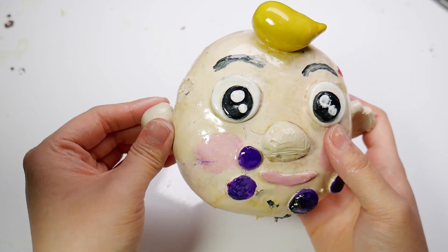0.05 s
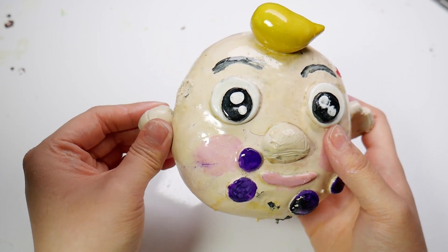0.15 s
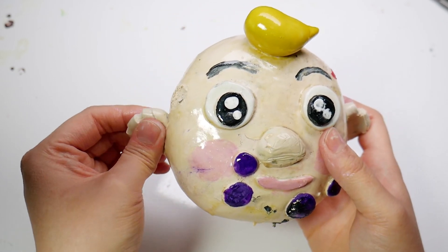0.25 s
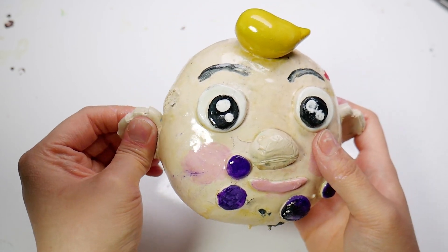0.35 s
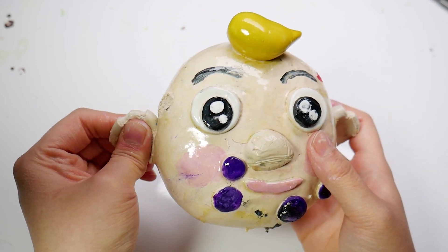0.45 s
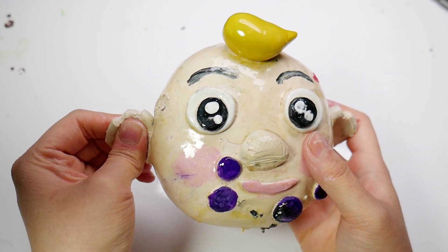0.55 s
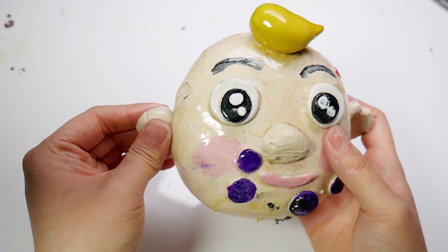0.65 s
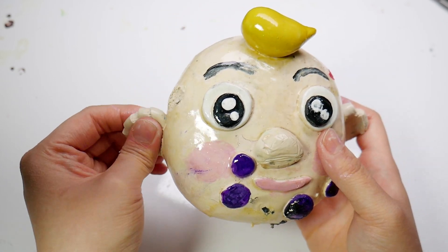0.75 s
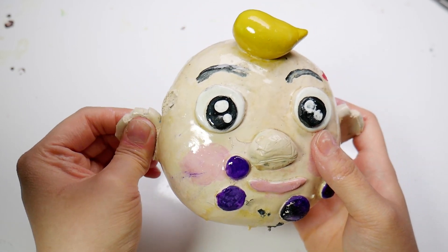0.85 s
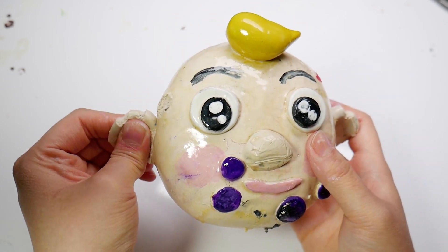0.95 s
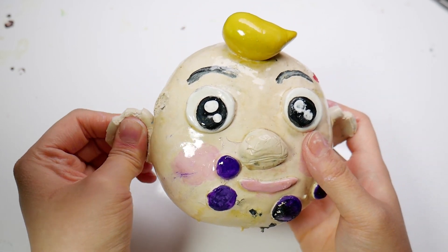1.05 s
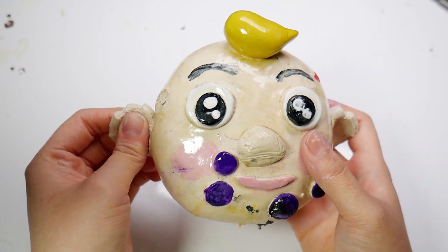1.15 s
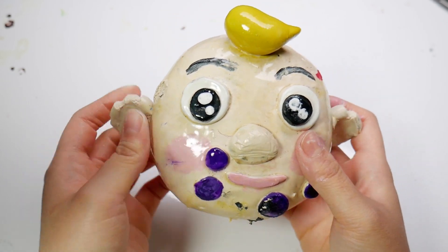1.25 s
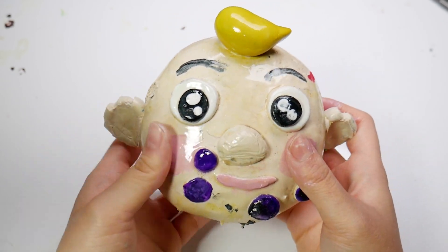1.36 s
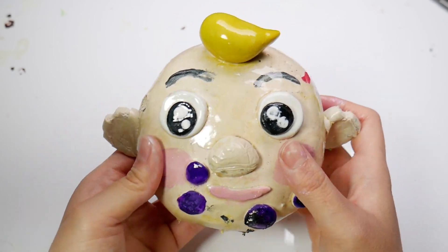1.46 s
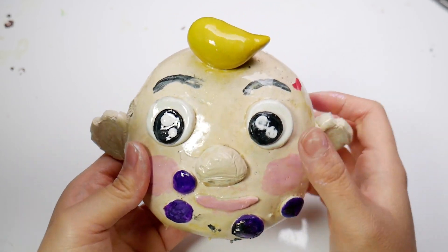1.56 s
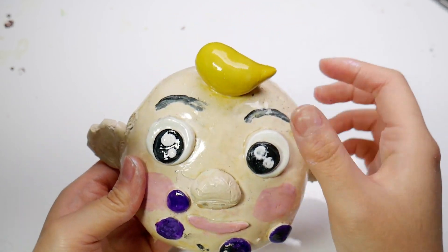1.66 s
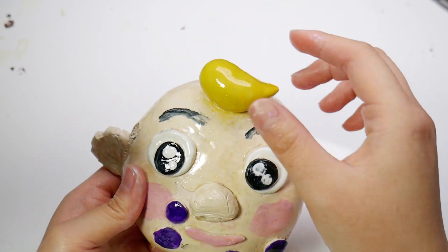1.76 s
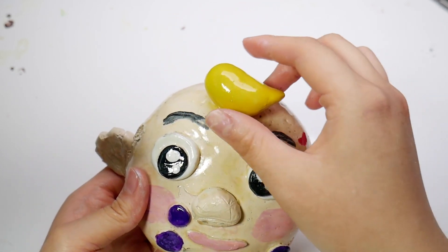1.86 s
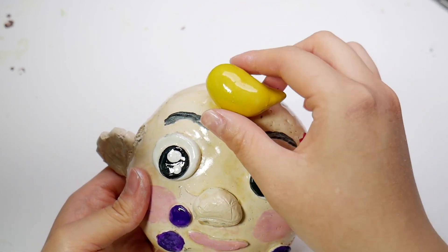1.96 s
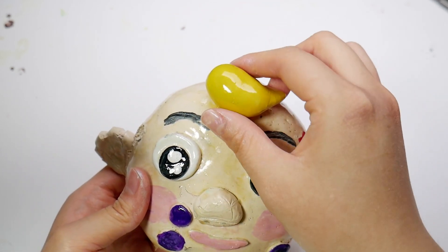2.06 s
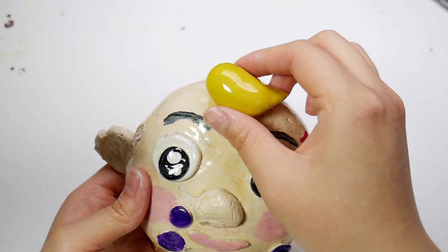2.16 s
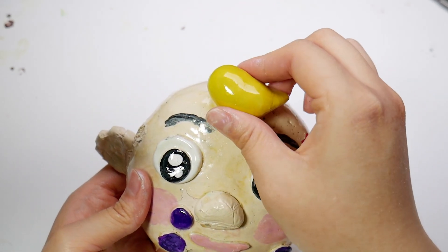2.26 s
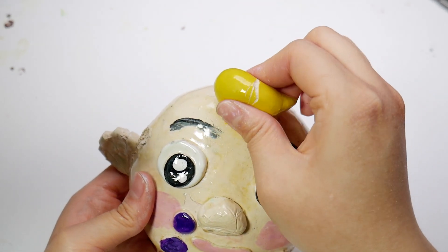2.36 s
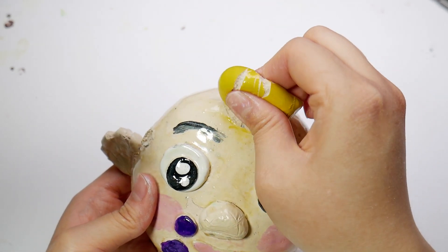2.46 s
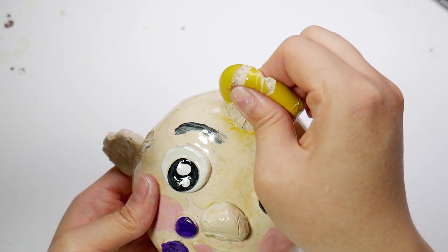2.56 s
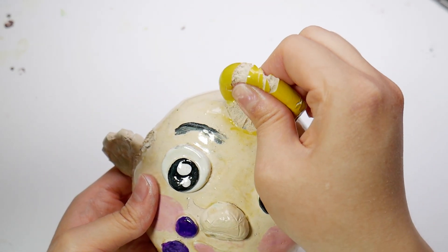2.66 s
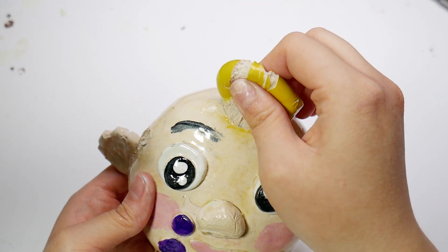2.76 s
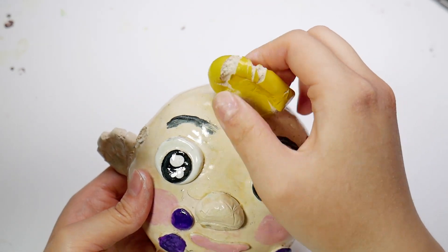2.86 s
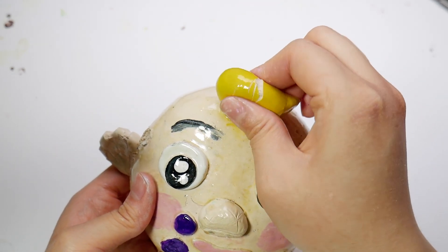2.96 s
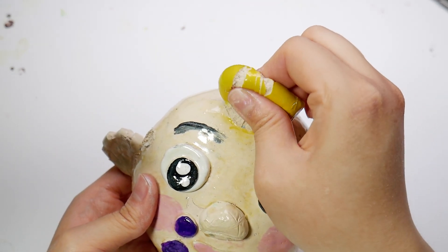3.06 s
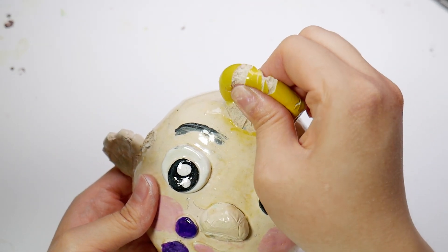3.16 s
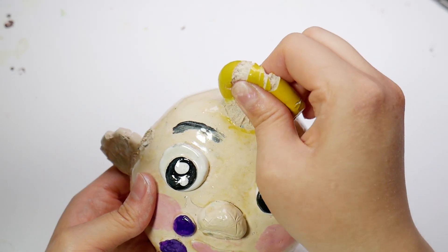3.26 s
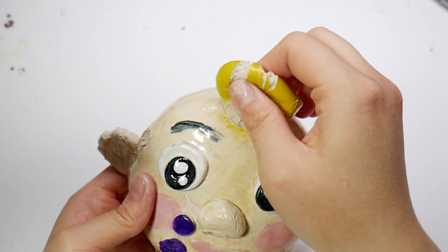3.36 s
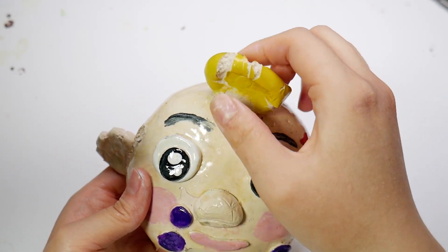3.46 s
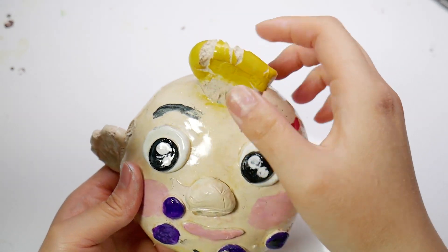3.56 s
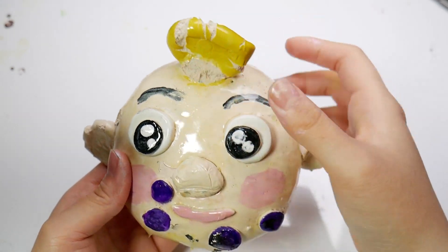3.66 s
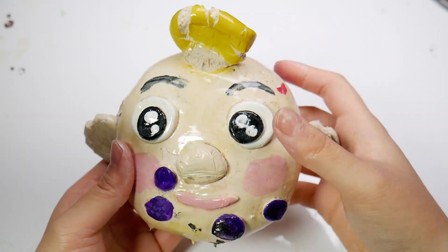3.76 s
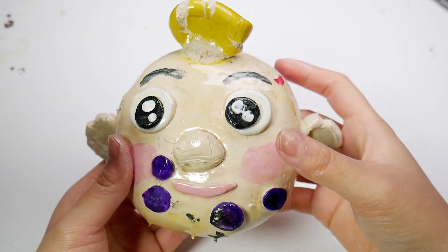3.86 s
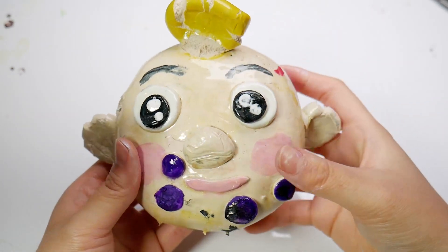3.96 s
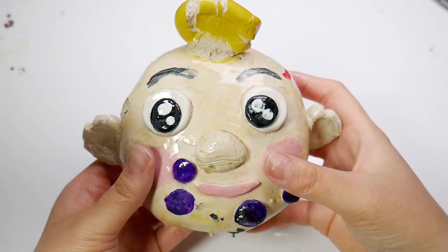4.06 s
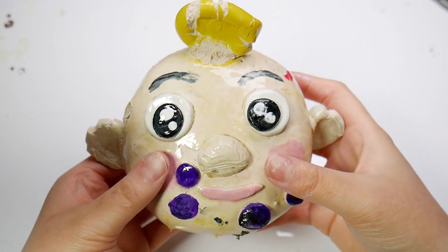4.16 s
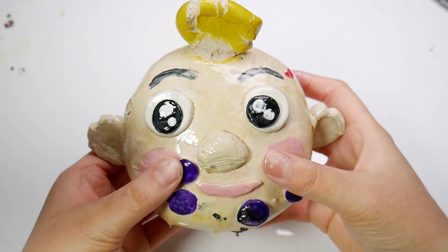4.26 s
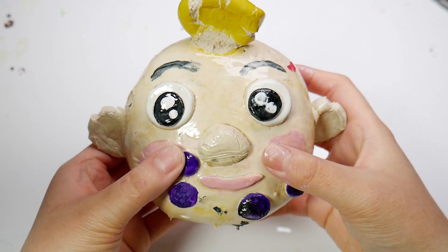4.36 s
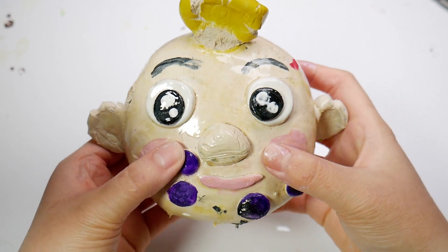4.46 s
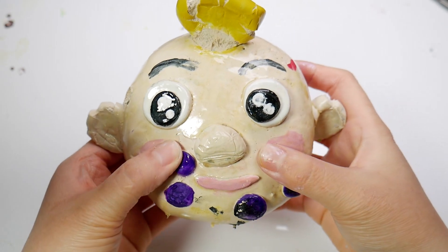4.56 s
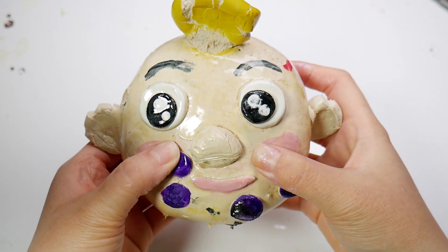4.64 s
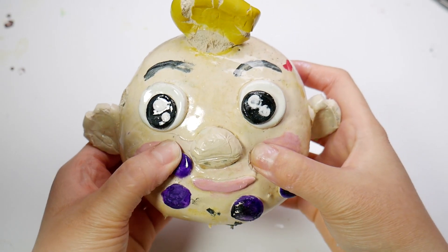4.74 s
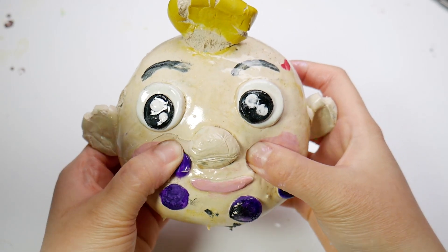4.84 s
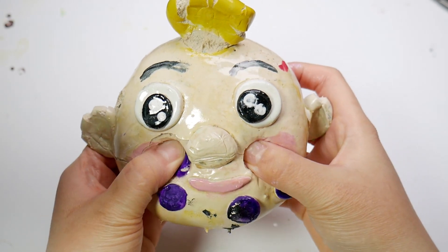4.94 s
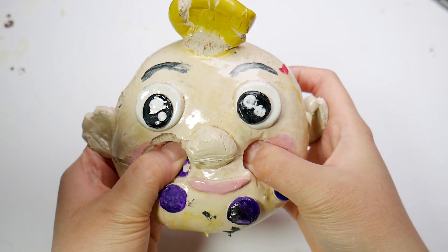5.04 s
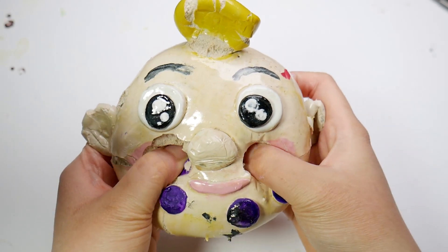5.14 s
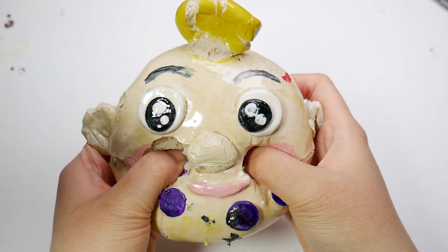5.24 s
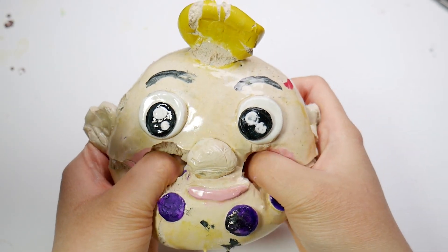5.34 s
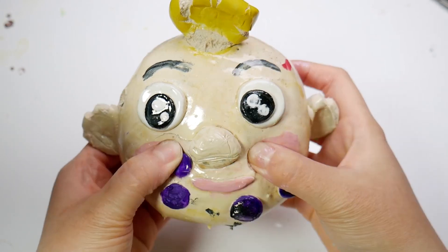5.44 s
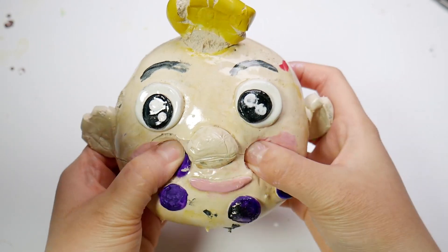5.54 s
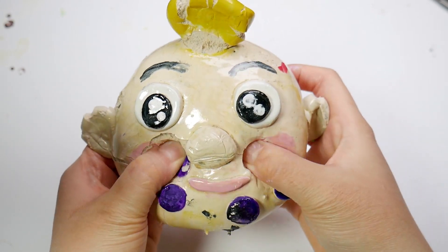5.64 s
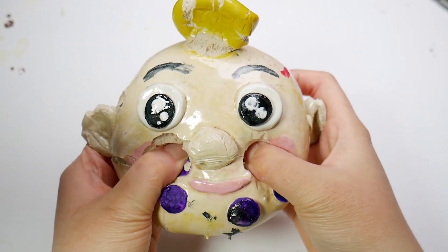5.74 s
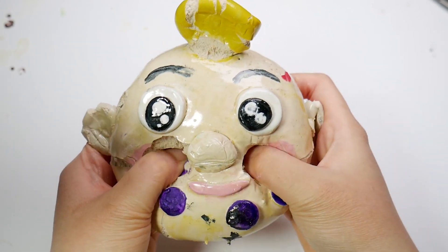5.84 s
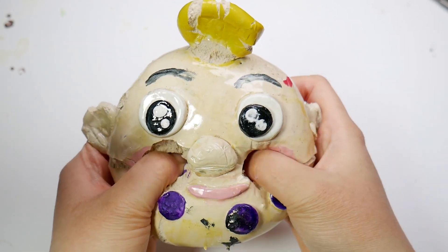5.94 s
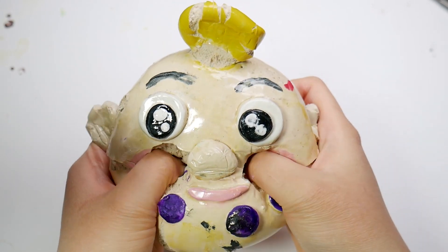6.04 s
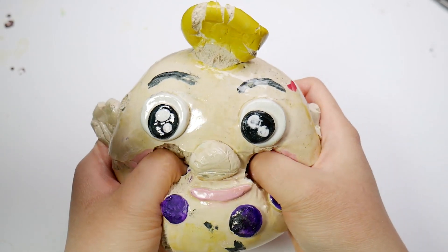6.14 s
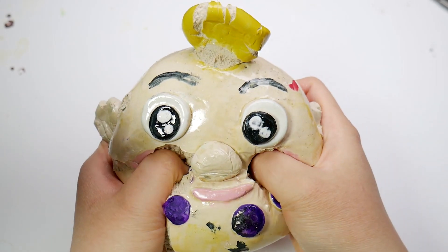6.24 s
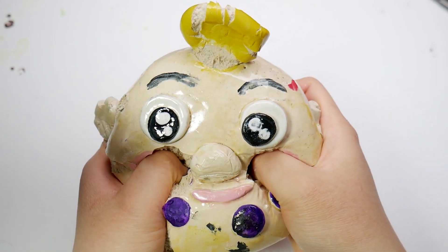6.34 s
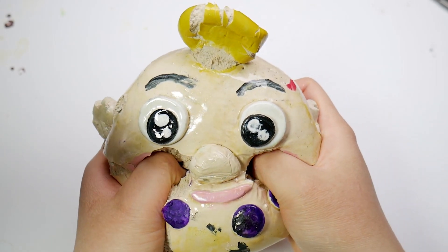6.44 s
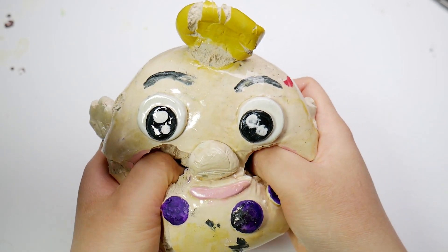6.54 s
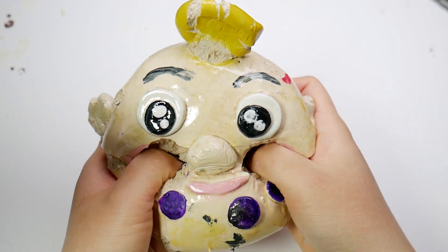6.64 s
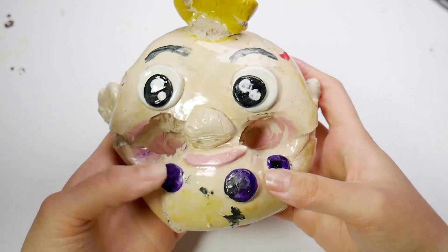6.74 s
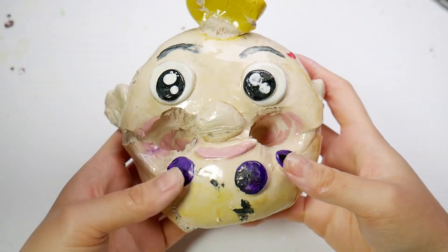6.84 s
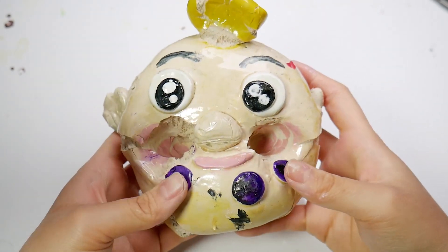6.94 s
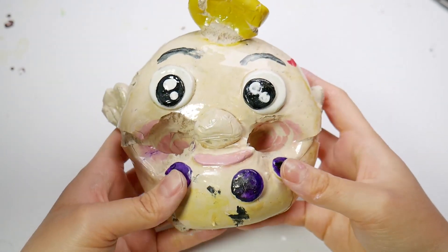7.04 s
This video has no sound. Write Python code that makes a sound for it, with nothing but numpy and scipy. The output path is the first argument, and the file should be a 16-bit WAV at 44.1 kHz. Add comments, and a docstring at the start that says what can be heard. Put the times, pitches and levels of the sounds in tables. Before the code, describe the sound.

A quiet, nearly dry room with very faint low hum and hiss, stereo microphone very close. From about 0.15 s a thin glazed clay ear snaps in a rapid cluster of bright, brittle cracks and gritty ticks; the same burst repeats at about 0.6 s, ending near 1.1 s. Small clicks and soft dull knocks follow at 1.2-1.6 s, then barely audible finger rubbing. At 2.38 s a thick piece breaks with loud, ringing, overloaded cracks and showering crumbs, repeated from about 2.9 s to 3.5 s. Quiet handling ticks until 4.6 s. From 4.7 s the hollow shell caves in: dense, heavy crunches with low-mid thumps, strongest around 4.9-5.4 s, repeated through about 6.1 s. Kneading continues with uneven snaps and crumbling to 6.6 s, then thins into sparse soft ticks and crumbs around 7 s.

```python
"""Fingers crack the glazed shell of a hollow clay figure close to a stereo microphone in a quiet room.
They break a thin ear, turn the figure and hold it still, then crack the tuft on top and change grip; the
cheeks cave in, the holes are kneaded and the figure is let go. Noise-driven resonances make each break snap,
ring and thump; random crumbs crackle around the breaks and soft damped sines are low thuds.
The input overloads, and an edit plays three bursts twice in a row: ear, tuft, then cheeks."""
import sys
import numpy as np
from scipy import signal
from scipy.fft import rfft, irfft
from scipy.io import wavfile
from scipy.ndimage import uniform_filter1d

SR = 44100
rng = np.random.default_rng(int(sys.argv[2]) if len(sys.argv) > 2 else 0)


def bounce(signal):
    """Save signal as a 16-bit WAV file at the path given by the first command-line argument."""
    frames = np.transpose(np.atleast_2d(signal))
    limited = np.clip(frames, -1, 1)
    pcm = np.round(limited * 32767).astype(np.int16)
    wavfile.write(sys.argv[1], SR, pcm)


def gain_from_db(level_db):
    """Convert decibel levels to linear amplitude factors (20 dB per decade)."""
    decades = np.asarray(level_db, float) / 20
    return 10 ** decades


N = 313110
T = np.arange(N) / SR


def level(x):
    """Scale to rms 1."""
    return x / np.sqrt(np.mean(x ** 2))


def resonate(x, peaks):
    """Sum of band-pass resonances (hz, width_hz, level_db) with alternating sign."""
    out = 0
    for k, (hz, width_hz, db) in enumerate(peaks):
        b, a = signal.iirpeak(hz, hz / width_hz, fs=SR)
        out = out + (-1) ** k * gain_from_db(db) * signal.lfilter(b, a, x)
    return out


def unit_gain(peaks):
    """Gain that keeps white noise at its own rms through the resonances."""
    impulse = np.eye(1, 4096)[0]
    return 1 / np.sqrt(np.sum(resonate(impulse, peaks) ** 2))


def colour(x, points):
    """Shape the spectrum by (hz, level_db) points, joined on a log frequency axis."""
    hz, db = np.transpose(points)
    f = np.maximum(np.arange(len(x) // 2 + 1) * SR / len(x), 1)
    gain = gain_from_db(np.interp(np.log(f), np.log(hz), db))
    return irfft(rfft(x) * gain, len(x))


def place(start_s, rows):
    """Lay one row of samples at each start time."""
    out = np.zeros(N + rows.shape[1])
    for start, row in zip((start_s * SR).astype(int), rows):
        out[start:start + len(row)] += row
    return out[:N]


# spectrum of the room air: hz, relative level_db (per Hz)
AIR_SPECTRUM = [(24, -47), (40, -13), (124, -1.5), (220, -6), (467, -12.5), (770, -14.5), (2840, -18),
                (16000, -29)]
# how far the side stands above the mid: hz, side_minus_mid_db
AIR_WIDTH = [(60, -16), (1300, -6), (12000, 1.5)]
# level of the air over time: time_s, mid_rms_db
AIR_LEVEL = [(2.3, -51), (3.5, -54)]


def air():
    """Room hum and microphone hiss are shaped noise, with a side signal that differs left and right."""
    mid, side = (colour(rng.standard_normal(N), AIR_SPECTRUM) for _ in range(2))
    gain = gain_from_db(np.interp(T, *np.transpose(AIR_LEVEL))) / np.std(mid)
    side = colour(side, AIR_WIDTH)
    return gain * np.array([mid + side, mid - side])


# what the fingers work on, in turn: thin ear, turning the figure, holding it still, tuft on top,
# changing grip, cheeks caving in, kneading the holes, letting go
# from_s, snap_db and crumbs_db (re break), crumb_body_db and crumb_grit_db (re their crackle drive)
PARTS = [(0, -1, -26, -13.5, 3), (1.4, -8.5, -49, -3, 0), (1.64, -9, -23, -6.5, -20),
         (2.3, -2.5, -27.5, -16, 0), (3.55, -4, -25, -3, -5.5), (4.58, -5.5, -22.5, -3.5, -15.5),
         (6.101, -5, -23, -5.5, -4.5), (6.62, -12, -28, -3.5, -9)]


def part(s):
    """Snap, crumb, crumb body and crumb grit levels of the part being worked on at times s."""
    rows = np.array(PARTS)
    current = np.searchsorted(rows[:, 0], s, side="right") - 1
    return rows[current, 1:].T


FLAKE_HZ, FLAKE_DB_PER_OCTAVE = 5000, -4.5  # higher shards are small flakes and move the shell less
SPIKE_DB, SPIKE_S = -4.5, 0.00071  # the first swings of a shard overshoot its ring
EAR_UNTIL_S, EAR_TOP_DB = 1.4, -1  # the thin ear adds this much of the highest grit resonance
# resonances of the hollow body, the glazed shell and the dry treble grit: hz, width_hz, level_db
BODY_PEAKS = [(161, 430, -11), (285.7, 81, -1.5), (530, 275, -3.5), (864, 150, 1.5), (1260, 360, -4.5)]
SHELL_PEAKS = [(1743, 1195, -1), (2630, 1960, 0.5), (3512, 460, 4.5), (5200, 4130, -8.5)]
GRIT_PEAKS = [(7150, 3370, -2.5), (13800, 2300, -7)]
# fractures: start_s, level_db, shard_ring_hz, thump_db (re level_db), ring_t60_ms
BREAKS = [(0.1514, 0.5, 4700, -13, 5.7), (0.1905, 7, 3520, -37.5, 12), (0.1995, 2, 7500, -29, 4),
          (0.2039, -3, 14600, -25.5, 5.7), (0.2105, 0, 14700, -24.5, 4.2), (0.21, -7.5, 3520, -15.5, 6),
          (0.2168, -4.5, 14800, -28, 3.3), (0.229, -8, 14500, -24, 4.6), (.251, 0, 3140, -13.5, 6.9),
          (0.2617, 1, 14800, -21, 6.3), (0.271, -1, 7840, -22, 18), (0.2798, -4.5, 9600, -20.5, 3.4),
          (0.283, -3, 8500, -26, 8.2), (0.291, -5.5, 3000, -9.5, 15), (0.2943, -4.5, 4800, -13, 14),
          (.303, -3, 3550, -9, 21), (0.3214, 4, 8750, -36, 8.4), (0.3252, -4.5, 3500, -27, 6),
          (0.3447, -3.5, 3240, -9.5, 12), (0.353, -10, 3200, -37.5, 3.6), (.359, -0.5, 3370, -37, 2.1),
          (0.3925, -3.5, 8900, -28, 4.1), (0.3945, -8.5, 3390, -42.5, 5.5), (0.401, 0, 3340, -25, 8.3),
          (0.4032, -2, 3420, -25.5, 8), (0.4116, -14.5, 3500, -29.5, 4.1), (0.4258, -7.5, 8870, -49.5, 4.4),
          (0.4305, 4.5, 3520, -35.5, 8.4), (0.4477, -16.5, 9250, -32.5, 3.3),
          (0.452, -12.5, 8760, -33.5, 6.6), (0.4656, -8.5, 9160, -23, 3.4), (0.482, 1.5, 10300, -22, 3.1),
          (0.4891, -21.5, 8900, -35, 2.4), (0.5113, -7, 12100, -39.5, 2), (1.1212, -18.5, 3680, -19, 3.6),
          (1.205, -26, 6000, -30, 6.6), (1.2393, -15, 7200, -25, 4.8), (1.257, -26.5, 7000, -11, 7.3),
          (1.2731, -15.5, 4100, -14.5, 10), (1.2815, -2.5, 6400, -21.5, 3), (1.2839, -2.5, 5230, -8.5, 2.5),
          (1.3304, -5, 5330, -12.5, 6.1), (1.4577, -16, 3700, -2.5, 8), (1.4706, -18, 1556, -1.5, 21),
          (1.496, -24.5, 1500, 3, 5.5), (1.5294, -8.5, 1700, -2.5, 6), (1.5485, -20, 2000, -16, 10),
          (1.59, -31, 3050, 6, 25), (2.3424, -16, 3280, -18, 7), (2.3475, -8, 1790, -30, 11),
          (2.362, -1.5, 1965, -34.5, 11), (2.3753, -7.5, 3100, -17.5, 11), (2.3847, 14.5, 1700, -26, 18.3),
          (2.4033, 11, 1806, -26.5, 24), (2.4384, 3, 3200, -20, 10), (2.4513, -6, 5970, -28.5, 4),
          (2.455, 7, 3140, -16.5, 16), (2.4663, -3.5, 3150, -17, 6.1), (2.4699, 1, 4040, -20, 8),
          (2.474, -5, 2200, -37, 4), (2.477, 1, 2000, -29, 5), (2.481, 2, 3310, -29.5, 5.9),
          (2.4847, -2, 3340, -21, 3.6), (2.4926, 0, 1740, -30, 11), (2.501, -4.5, 2010, -22, 18),
          (2.5227, -4, 3100, -26.5, 5), (2.5322, -16.5, 2550, -20.5, 6), (2.5416, -13.5, 3290, -28.5, 4),
          (2.5597, 2, 3520, -31.5, 11), (2.5617, 0.5, 2546, -31, 24), (2.5677, -1, 7200, -39.5, 6.8),
          (2.5702, -0.5, 4400, -29.5, 5.6), (2.603, -3.5, 1886, -31, 11), (2.607, -5.5, 2760, -27, 4),
          (2.6226, 0.5, 3570, -26, 5), (2.6287, -3, 2840, -28.5, 12), (2.648, -9.5, 2000, -32, 9.5),
          (2.6544, -9, 3055, -24, 8.9), (2.6695, -13.5, 3270, -24, 3.75), (2.6795, -14.5, 3200, -38, 4.9),
          (2.7369, -1.5, 3200, -17, 10), (2.8158, -7, 1850, -19, 12), (2.8919, -7.5, 3310, -10, 18),
          (2.9191, -18.5, 3400, -4, 8.6), (3.8748, -30, 990, 1.5, 8), (3.9645, -25.5, 2920, 1.5, 7.6),
          (3.9787, -26, 3300, 1, 14), (4.0816, -16, 1196, -4.5, 12), (4.1378, -13, 1330, -6.5, 8),
          (4.2725, -13, 2600, -8.5, 5), (4.603, -28, 1670, -34, 13), (4.6601, -13.5, 1600, -7, 9.8),
          (4.7109, -1, 3130, -8, 17), (4.7498, -14.5, 2000, -25, 4), (4.7539, 4, 1743, -8, 16),
          (4.795, 7, 1386, -7, 6.2), (4.8058, 5.5, 3200, -4.5, 8), (4.8204, -4.5, 3250, -6, 5),
          (4.8251, -2, 3250, -5.5, 10), (4.8422, 0.5, 1660, -20, 8.1), (4.8475, 2.5, 2110, -13, 8.7),
          (4.863, -1, 1810, -10, 4.9), (4.8707, 2, 3430, -24, 7), (4.874, -1.5, 13200, -28.5, 3.6),
          (4.8936, 0, 3210, -2.5, 4.8), (4.8995, 10.5, 2030, -0.5, 17), (4.9182, -0.5, 3480, -8, 7.5),
          (4.927, 4, 2734, -8, 7), (4.936, 10.5, 1845, -11, 7.9), (4.9423, -3.5, 3460, -9, 4),
          (4.949, -5.5, 3350, -2, 8), (4.9559, 6.5, 3440, -7.5, 5.36), (4.9637, 2.5, 1800, 0.5, 6.6),
          (4.9736, 7.5, 1490, 1.5, 13), (4.9764, -0.5, 3550, -9, 7.3), (4.9848, 3, 3090, -0.5, 15),
          (4.994, 9, 2080, -8, 10.5), (4.9977, 9.5, 2110, 0, 6), (5.009, 0.5, 1185, -13, 4),
          (5.0174, 1.5, 2930, -21, 4), (5.02, 9, 1700, -14, 7.5), (5.028, -1, 2550, -23.5, 9.2),
          (5.0313, 5, 2410, -17.5, 8.5), (5.058, -3, 1723, -8, 20), (5.0756, 6.5, 2605, 0.5, 20),
          (5.0913, 0.5, 3350, -1, 22), (5.0985, 8, 2300, -6.5, 17), (5.1037, -2.5, 2400, -8.5, 7.8),
          (5.1227, -9, 3100, -9.5, 12), (5.1388, 11, 2426, -10, 5.8), (5.1563, -3.5, 3380, -17.5, 10),
          (5.1679, 3.5, 1290, -3, 11), (5.1716, 8.5, 2300, 0, 9), (5.177, 4.5, 2580, -9.5, 12),
          (5.1951, -4, 3810, -3, 4), (5.2118, -7, 1600, -2, 4), (5.23, 6.5, 2780, -2.5, 10),
          (5.2341, 1, 2560, -13, 14), (5.244, -2.5, 3520, -16.5, 4.7), (5.26, 1.5, 2750, -2.5, 13),
          (5.2836, -10, 2730, -10, 5), (5.2948, 6.5, 2410, -5, 4), (5.3031, 8, 2300, -21, 3.5),
          (5.3046, -0.5, 3360, -3, 6), (5.3254, 0, 1260, 2, 3.6), (5.3307, -9.5, 3360, -11.5, 5),
          (5.3365, -9, 3580, -9, 24), (5.3607, -5, 3570, -33, 4.5), (5.431, -7, 3740, -14, 3.7),
          (5.4351, 6, 2790, -5, 8.4), (6.1158, -9, 3290, -12, 3.7), (6.1317, -8.5, 2870, 2, 7),
          (6.1444, -2.5, 2950, -25, 7.7), (6.1513, -0.5, 2690, -0.5, 17), (6.1653, 0, 2740, -6.5, 5.7),
          (6.1712, 2, 2700, -29, 10), (6.1755, -2.5, 3040, -22, 4), (6.1908, -3, 3050, -16, 5),
          (6.1928, 1.5, 3250, -16, 9), (6.2449, 8.5, 3480, -33, 6.3), (6.258, -3.5, 1700, -4.5, 9),
          (6.2773, -2.5, 4470, -29, 1.8), (6.3136, -2, 3030, -3.5, 8), (6.349, -3, 3170, -16.5, 4.6),
          (6.3551, -5, 2210, -8.5, 8), (6.368, -4.5, 2890, -6.5, 12), (6.3762, 0.5, 3670, -22, 3.4),
          (6.3947, -15.5, 1320, -6, 4), (6.4159, -14.5, 3100, -4, 4.5), (6.4427, -9.5, 2930, -9, 7),
          (6.4495, -1.5, 3360, -12.5, 4.9), (6.456, -10, 3380, -2, 6), (6.4727, 0, 7500, -18, 5),
          (6.5184, 3, 5200, -10.5, 2.9), (6.5804, -13, 2640, -6.5, 4.2), (6.706, -15.5, 3150, -7.5, 11),
          (6.7257, -11, 2630, -21, 6), (6.684, -21, 2940, -17, 7.7), (6.7429, -14, 1570, 2.5, 4),
          (6.7885, -24, 3250, -5, 6), (6.891, -14.5, 2600, 2, 6.7), (7.045, -21, 1630, -6, 38)]


def breaks():
    """A shard rings on three neighbouring partials; the same fracture noise drives shell, grit and body."""
    s, db, hz, thump_db, t60_ms = np.transpose(BREAKS)[:, :, None]
    start_s = s[:, 0]
    snap_db = part(start_s)[0][:, None] + db
    flake_db = FLAKE_DB_PER_OCTAVE * np.log2(np.maximum(hz / FLAKE_HZ, 1))
    t = np.arange(2048) / SR
    chance = rng.standard_normal((len(s), len(t) + 3))
    noise, detune = chance[:, 3:], chance[:, :3]
    # the decay starts a touch slowly, then quickens
    fade = np.log(1000) * (t / (np.maximum(t60_ms, 1) / 1000)) ** 1.019
    rise = 1 - np.exp(-t / .0001)

    # the spreading crack keeps knocking the ring out of step, which widens it
    jolt = 0.12 * np.cumsum(uniform_filter1d(noise, size=9, axis=1), axis=1)
    ring = 0
    for k, (share, spread) in enumerate([(0.82, 0.0015), (0.29, 0.081), (0.43, 0.082)]):
        partial_hz = hz * (1 + spread * detune[:, [k]])
        ring = ring + share * np.sin(2 * np.pi * partial_hz * t + jolt)
    ring_shape = np.exp(-fade) + gain_from_db(SPIKE_DB) * np.exp(-t / SPIKE_S)
    shard = place(start_s, gain_from_db(db) * rise * ring_shape * ring / 2)

    # the fracture runs on after the snap as a weaker, longer rasp
    rasp = noise * rise * (np.exp(-1.3 * fade) + gain_from_db(-21.5) * np.exp(-fade / 8))
    shell_drive = place(start_s, gain_from_db(db + flake_db) * 0.5 * rasp)
    shell = resonate(shell_drive, SHELL_PEAKS) * unit_gain(SHELL_PEAKS)

    # the treble leaves almost at once: a dry tick
    side = np.sign(detune[:, :1])
    snap = 2.07 * side * (t == 0) + noise * rise * (np.exp(-t / 0.0003) + 0.12 * np.exp(-1.6 * fade))
    ticks = place(start_s, gain_from_db(snap_db) * snap)
    # the top peak has negative sign within the sum, so subtracting adds to it
    ear_top = resonate(ticks * (T < EAR_UNTIL_S), GRIT_PEAKS[1:])
    grit = resonate(ticks, GRIT_PEAKS) - gain_from_db(EAR_TOP_DB) * ear_top
    grit = grit * unit_gain(GRIT_PEAKS)

    # the shell gives way with one short push, inward or outward
    push = 1.47 * side * rise * np.exp(-t / 0.00012)
    body_drive = place(start_s, gain_from_db(db + thump_db) * (0.32 * rasp + push))
    thump = resonate(body_drive, BODY_PEAKS) * unit_gain(BODY_PEAKS)
    return shard + shell + grit + thump


def die_away(power, t60_s):
    """Exponential decay of power, 60 dB in t60_s."""
    return signal.lfilter([1], [1, -gain_from_db(-60 / (t60_s * SR)) ** 2], power)


SWELL_T60_S, SWELL_DB = 0.011, 3.5  # a brief swell of crackle leading into the breaks
SHOWER_T60_S, SETTLE_T60_S, SETTLE_DB = 0.032, 0.19, -7.5  # crumbs shaken loose, and the last stragglers
# fingers pressing and sliding: peak_s, crackle_db, rise_s, fall_s (rise and fall over 20 dB)
RUBS = [(0.188, -31.5, 0.017, 0.025), (0.199, -23, 0.022, .12), (1.111, -61, .1, 0.22),
        (1.277, -35, 0.086, 0.038), (1.543, -39, 0.16, 0.11), (1.8, -54, 0.73, 0.63),
        (2.055, -46.5, .12, 0.097), (2.477, -14, 0.07, 0.051), (2.564, -13.5, 0.011, 0.045),
        (2.889, -30, 0.16, 0.046), (3.5, -50, 0.024, 0.11), (3.911, -42.5, 0.098, 0.03),
        (4.07, -45.5, 0.29, 0.34), (4.76, -28, 0.064, 0.15), (4.85, -29, 0.094, 0.073),
        (4.989, -22.5, 0.059, 0.13), (5.172, -14.5, 0.04, 0.1), (5.3, -19, 0.22, 0.16),
        (6.08, -19, 0.022, 0.065), (6.198, -26, .01, .04), (6.532, -35.5, 0.017, 0.17),
        (6.718, -29, 0.083, 0.18), (6.89, -28.5, 0.026, 0.036), (7.059, -38.5, 0.034, 0.09)]


def crackle_db():
    """Crackle swells briefly into the breaks and showers after them; sliding fingers add their own power."""
    s, db = np.transpose(BREAKS)[:2]
    shaken = place(s, gain_from_db(db + part(s)[1])[:, None] ** 2)
    shower = die_away(shaken, SHOWER_T60_S)
    settling = gain_from_db(SETTLE_DB) ** 2 * die_away(shaken, SETTLE_T60_S)
    # a decay run backwards in time rises towards the break
    swell = gain_from_db(SWELL_DB) ** 2 * die_away(shaken[::-1], SWELL_T60_S)[::-1]
    power = shower + settling + swell + 1e-9
    for peak_s, rub_db, rise_s, fall_s in RUBS:
        distance = np.maximum((peak_s - T) / rise_s, (T - peak_s) / fall_s)
        power = power + gain_from_db(rub_db - 20 * distance) ** 2
    return 10 * np.log10(power)


LARGEST_CRUMB_DB = 10  # above the smallest
CRUMB_COLOUR_DB = 3.5  # how unevenly one crumb excites shell, body and grit
GRIT_PER_DB, FIRM_DB = 1.2, -20  # grit grows faster than the crackle, about a firm press


def crumbling(crumbs_per_s=1200, rub=0.6):
    """Random crumbs, mostly tiny and a few large, over the rub of skin; each rings shell, body and grit."""
    crackle = crackle_db()
    body_db, grit_db = part(T)[2:]
    shell_level_db = crackle
    body_level_db = crackle + body_db
    grit_level_db = FIRM_DB + GRIT_PER_DB * (crackle - FIRM_DB) + grit_db
    # a light touch only rustles; under force the crumbs differ widely in size
    spread_db = np.interp(crackle, [-55, -30], [2, 5.2])
    size_db = np.minimum(spread_db * rng.exponential(size=N), LARGEST_CRUMB_DB)
    size = (rng.random(N) < crumbs_per_s / SR) * gain_from_db(size_db)
    layers = [(shell_level_db, SHELL_PEAKS), (body_level_db, BODY_PEAKS), (grit_level_db, GRIT_PEAKS)]
    out = 0
    for db, peaks in layers:
        # the wider the spread, the lower the smallest crumbs lie
        hits = size * gain_from_db(CRUMB_COLOUR_DB * rng.standard_normal(N) - 1.6 * spread_db)
        burst = signal.lfilter([1], [1, -np.exp(-1 / (0.0003 * SR))], hits)  # 0.3 ms decay
        drive = level(burst * rng.standard_normal(N)) + rub * rng.standard_normal(N)
        out = out + gain_from_db(db) * level(resonate(drive, peaks))
    return out


def room(x, t60_s=0.25, wet_db=-20):
    """Short, dull reflections from table and walls: convolution with decaying, low-passed noise."""
    t = np.arange(8192) / SR
    tail = rng.standard_normal(8192) * (1 - np.exp(-t / 0.0011)) * np.exp(-np.log(1000) * t / t60_s)
    tail = signal.lfilter(*signal.butter(1, 4500, fs=SR), tail)
    return gain_from_db(wet_db) * signal.fftconvolve(x, tail / np.linalg.norm(tail))[:N]


# low thuds, among them the lopsided low swing under two overloaded cracks:
# start_s, level_db (before damping), pitch_hz
THUDS = [(0.189, -23, 70), (5.23, -13, 79.5), (1.3318, -14, 530), (1.46, -22, 149), (1.473, -18, 172),
         (1.529, -18, 116), (2.126, -25, 510), (3.8755, -26.5, 100), (6.8693, -19.5, 446)]


def thuds(decay_s=0.0022, at_hz=400):
    """A soft thud is a sine damped within a few swings; deeper ones last longer."""
    s, db, hz = np.transpose(THUDS)[:, :, None]
    t = np.arange(2048) / SR
    damping = np.exp(-t / decay_s * np.sqrt(hz / at_hz))
    return place(s[:, 0], -gain_from_db(db) * np.sin(2 * np.pi * hz * t) * damping)


def scene():
    """Clay in the middle, its reflections and the room air."""
    clay = breaks() + crumbling() + thuds()
    return clay + room(clay) + air()


TOP_HZ = 15900  # upper edge of what the microphone passes
# presence peak added by the microphone: hz, width_hz, level_db
MIC_PEAK = [(3400, 320, -11.5)]


def microphone(dry):
    """Lifts the presence band and cuts the top; the overloaded input then clips flat."""
    low_pass = signal.ellip(8, .2, 60, TOP_HZ, fs=SR, output="sos")
    lifted = dry + resonate(dry, MIC_PEAK)
    return np.clip(signal.sosfiltfilt(low_pass, lifted), -1, 1)


# stretches played again straight after themselves: start_s, length_s
REPLAYS = [(.142, 21126 / SR), (2.379, 24646 / SR), (4.803, 28167 / SR)]


def replay_bursts(x):
    """The edit copies each stretch over the time that follows it."""
    for start_s, length_s in REPLAYS:
        i, k = int(start_s * SR), round(length_s * SR)
        x[:, i + k:i + 2 * k] = x[:, i:i + k]
    return x


def flickering_width(x, share=0.32, low_db=-15, high_db=-8.5):
    """Brief patches, a band wide and some 35 ms long, add phase-scattered mid sound to the sides."""
    hz, _, mid = signal.stft(x.mean(axis=0), SR, nperseg=1024)
    band = (np.sqrt(hz / hz[-1]) * 30).astype(int)
    patch = rng.random((31, mid.shape[1] // 3 + 1)) < share
    # each patch lasts three frames
    spread = np.repeat(patch, 3, axis=1)[band, :mid.shape[1]]
    scatter = np.exp(2j * np.pi * rng.random(mid.shape))
    gain = gain_from_db(np.interp(hz, [2500, 8000], [low_db, high_db]))[:, None]
    side = signal.istft(mid * spread * scatter * gain, SR, nperseg=1024)[1][:N]
    return x + np.array([side, -side])


def top_cut(x):
    """Nothing passes above the cut-off."""
    return signal.sosfilt(signal.butter(12, 16930, fs=SR, output="sos"), x)


def record(dry):
    """The microphone takes the scene, the edit repeats three stretches, and the width flickers."""
    edited = replay_bursts(microphone(dry))
    mix = flickering_width(edited)
    return top_cut(mix)


dry = scene()
out = record(dry)
bounce(out)
```